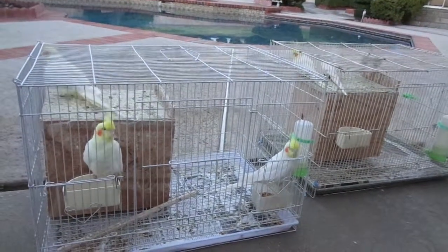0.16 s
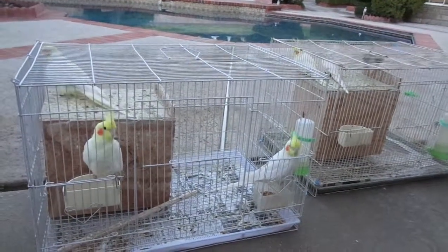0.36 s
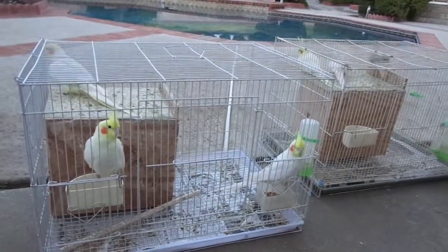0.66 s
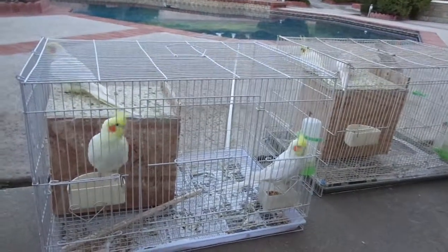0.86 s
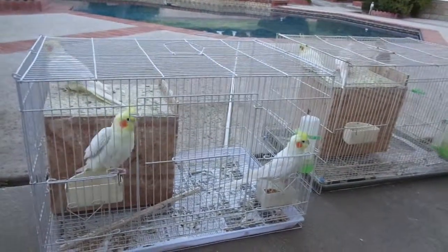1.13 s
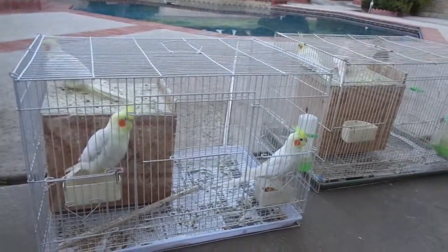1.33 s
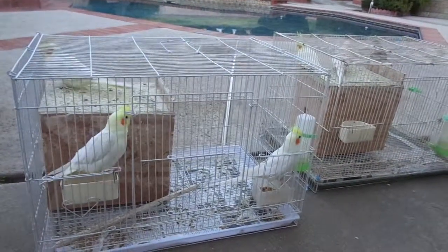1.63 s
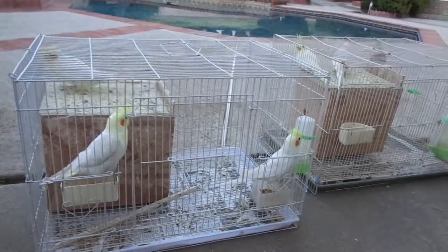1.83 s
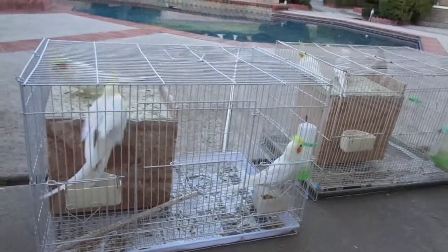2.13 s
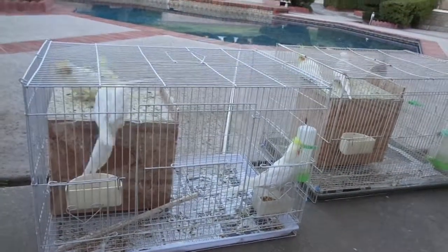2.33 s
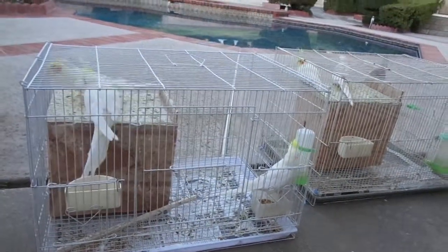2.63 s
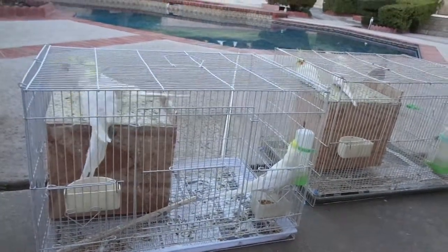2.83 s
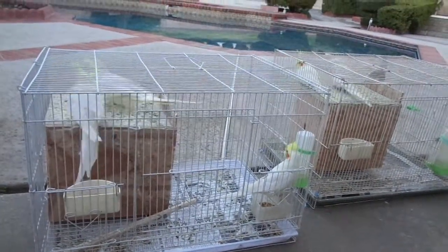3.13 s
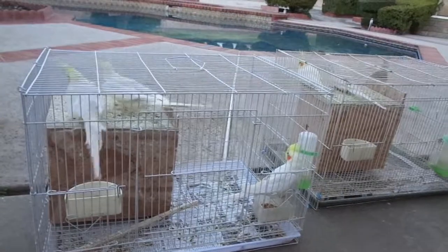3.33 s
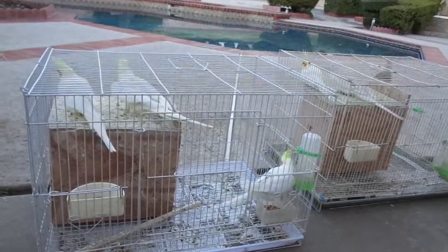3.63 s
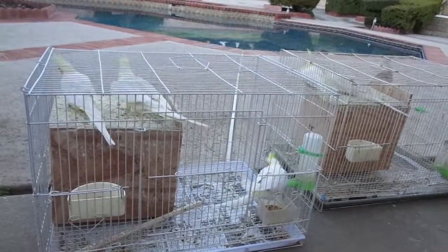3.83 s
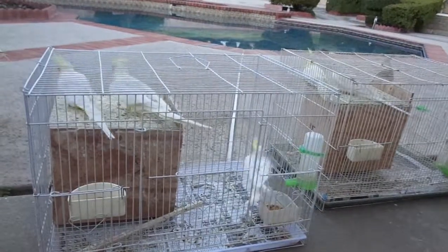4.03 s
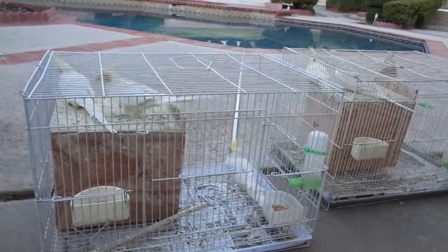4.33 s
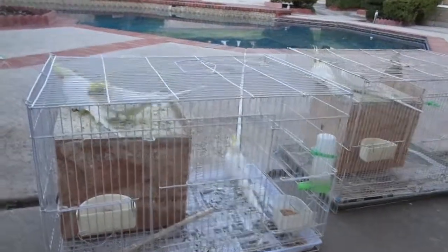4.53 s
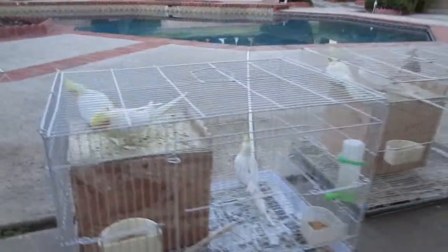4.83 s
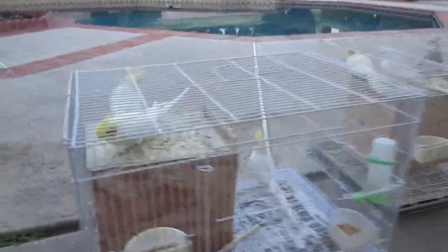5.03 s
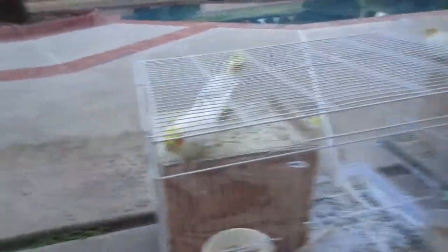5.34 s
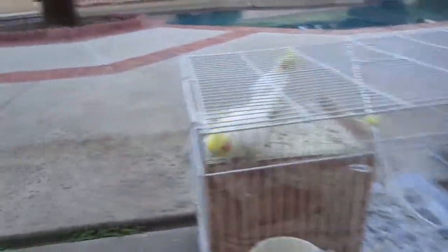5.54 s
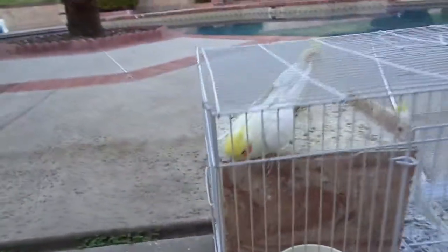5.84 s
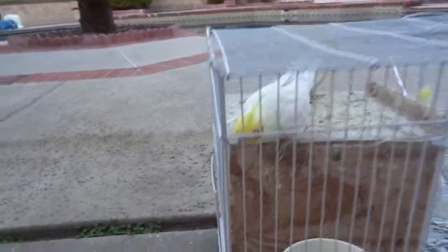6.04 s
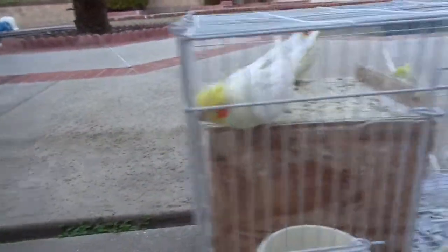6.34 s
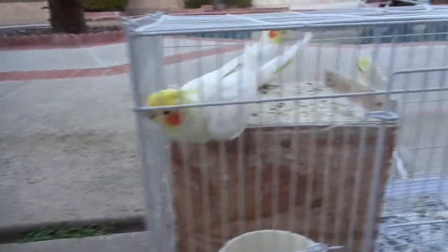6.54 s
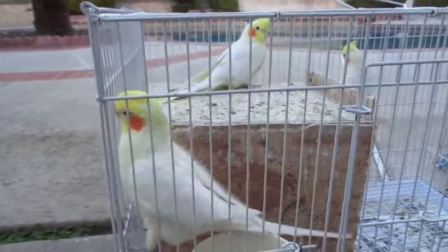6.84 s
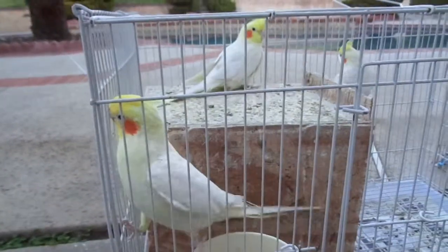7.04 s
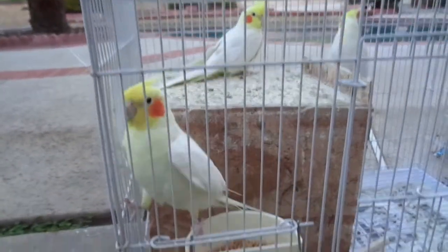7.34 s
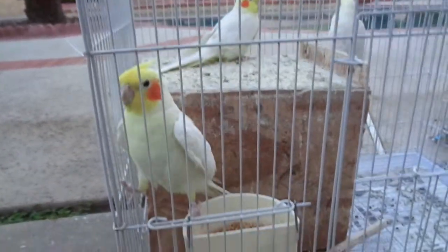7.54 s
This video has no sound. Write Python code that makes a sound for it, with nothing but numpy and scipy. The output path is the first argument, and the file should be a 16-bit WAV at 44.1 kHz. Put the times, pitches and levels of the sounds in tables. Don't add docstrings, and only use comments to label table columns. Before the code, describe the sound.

Caged cockatiels outdoors: clear whistled phrases, trilling warbles, a pause, one raspy chirp and croak, light claw taps over soft suburban hush.

```python
import sys
import numpy as np
from scipy import signal
from scipy.io import wavfile
from scipy.ndimage import uniform_filter1d

SR = 44100
rng = np.random.default_rng(int(sys.argv[2]) if len(sys.argv) > 2 else 0)


def ratio_of_db(decibels):
    return 10 ** (np.asarray(decibels, float) / 20)


def wav_record(signal):
    frames = np.transpose(np.atleast_2d(signal))
    bounded = np.clip(frames, -1, 1)
    quanta = np.round(bounded * 32767).astype(np.int16)
    wavfile.write(sys.argv[1], SR, quanta)


N = 338688

# start t/s, length t/s, from f/Hz, to f/Hz, peak level/dB
EASED_NOTES = [
    (0.024, 0.12, 2210, 2282, -16),
    (0.655, 0.082, 2234, 2029, -19),
    (2.93, 0.073, 1900, 2253, -22),
    (3.507, 0.1106, 2242, 2381, -17),
    (3.961, 0.092, 2318, 2442, -14.5),
]
# start t/s, length t/s, from f/Hz, to f/Hz, peak level/dB
HELD_NOTES = [
    (0.235, 0.084, 2175, 1896, -19.5),
    (0.439, 0.11, 2351, 2281, -17.5),
    (0.873, .103, 2239, 2166, -18),
    (3.309, 0.075, 2186, 2080, -23.5),
]
# start t/s, length t/s, from f/Hz, to f/Hz, peak level/dB
SETTLED_NOTES = [
    (1.081, 0.077, 2081, 1981, -22.5),
    (2.614, 0.075, 1941, 1611, -34.5),
    (3.723, 0.091, 2125, 1963, -23),
    (4.181, 0.081, 1971, 1911, -16.5),
]
# start t/s, length t/s, from f/Hz, to f/Hz, peak level/dB
ARCHED_NOTES = [
    (2.679, .09, 1790, 1530, -18.5),
]
# start t/s, length t/s, from f/Hz, to f/Hz, peak level/dB
NEAR_CHIRP = (6.437, .042, 1365, 1195, -25)
# peak [share of length],
# then octave, low and high overtones level/dB below the peak
BEAK_LEVELS = [(0.52, -34.5, -47.5, -39.5), (0.44, -37, -40, -38), (0.6, -33, -42, -40.5),
               (0.69, -35.5, -43.5, -38), (.45, -38.5, -46.5, -50), (0.37, -42.5, -41.5, -38),
               (0.55, -39.5, -40, -34.5), (0.55, -45, -40.5, -41.5), (0.78, -27, -44, -42),
               (0.72, -31, -39, -45.5), (0.66, -45, -50.5, -57), (0.73, -24.5, -41, -45.5),
               (0.6, -37, -50, -56), (0.62, -21.5, -49, -53.5)]
CHIRP_BEAK_LEVELS = (.27, -35, -31, -62)
# entry pitch [share], entry t/s, glide delay [power], glide ease [power],
# entry level/dB, spoken level/dB
EASE_WAY = (0.9354, 0.0263, 1.01, 1.96, -26, -8)
HOLD_WAY = (0.935, 0.01, 2.5, 1.13, -22.5, -5.5)
LAND_WAY = (1.035, .024, 1.01, 4, -22, -10)
LINGER_WAY = (.99, .015, 1.7, 1.4, -16, -5)
SETTLE_WAY = (1.02, .014, 1.01, 2.4, -25, -15)
ARCH_WAY = (.93, .05, 3.2, 1.01, -15, -3)
SNAP_WAY = (1, .004, 1, 1.7, -5, -2)
BEAK_PEAK_SHARES = (0.63, 0.55, .35)
BEAK_END_DB = (-17.5, -14, -12.5)
# multiple of the fundamental [1], level/dB
LOW_PARTIALS = [(3, 3), (4, -10.5)]
# multiple of the fundamental [1], level/dB
HIGH_PARTIALS = [(5, 0.5), (6, 7), (7, -2.5)]
END_DB, CHIRP_END_DB, BEAK_CLOSED_DB = -7.5, -13.5, -36
# t/s, length t/s, from f/Hz, to f/Hz, level/dB
PITCH_FLICKS = [(.008, .028, 1650, 2700, -47), (0.207, .02, 1490, 1890, -49),
                (0.29, 0.021, 1962, 1860, -29), (0.528, 0.012, 1900, 1500, -45),
                (0.495, 0.032, 3060, 2770, -57), (0.723, .014, 1990, 1740, -38),
                (0.953, 0.013, 1780, 1610, -40.5), (0.953, .014, 2650, 2890, -58),
                (1.144, 0.0217, 2045, 2370, -31), (2.762, 0.023, 1650, 1430, -36),
                (4.81, 0.027, 3400, 3600, -46), (3.294, 0.031, 1810, 2150, -32.5),
                (3.363, 0.014, 1980, 1700, -33), (3.598, 0.011, 2530, 2940, -43),
                (3.788, .014, 1730, 1510, -47), (4.034, 0.02, 1850, 1500, -45),
                (4.03, 0.019, 5000, 2950, -51), (4.24, 0.0213, 1974, 2300, -24),
                (2.7, 0.019, 1500, 1750, -33.5), (6.427, 0.0084, 1450, 1200, -37),
                (7.07, 0.074, 4180, 3930, -59), (2.02, 0.048, 3800, 4150, -57),
                (7.46, 0.0082, 2000, 2500, -49), (7.482, 0.0085, 2240, 2300, -55)]
# t/s, length t/s, from f/Hz, to f/Hz, level/dB
SQUEAKS = [
    (3.168, .016, 3300, 3250, -42),
    (3.262, .014, 3250, 3350, -48),
    (3.286, .016, 3300, 3350, -45),
    (6.446, .016, 13000, 12300, -61),
    (6.446, .014, 11900, 11400, -61),
]
# t/s, level/dB, half-width t/s
WHISTLE_DIPS = [(0.08, -10.5, 0.0051), (0.308, -1, 0.0067), (0.47, -11, 0.0062), (0.493, -37, 0.0087),
                (0.529, -6, 0.0037), (0.691, -6, 0.0043), (0.703, -1, .004), (0.723, -28, 0.0045),
                (0.737, -12, 0.0075), (0.946, -8, 0.0035), (3.351, -22, 0.0026), (3.547, -10, 0.011),
                (3.571, -4, 0.0039), (3.58, -8, 0.0035), (4.005, -6, 0.0037), (4.017, -6, 0.003),
                (4.046, -14.5, 0.0027), (4.257, -12, 0.0093), (4.39, -7, .04), (.042, 4, .01),
                (.32, 6, .005), (.355, -4, .025), (.68, 4, .008), (.9, 2.5, .012), (.976, 4, .009),
                (1.33, 5, .07), (2.765, 4, .007), (2.952, 5, .016), (2.985, 3, .004), (3.558, 3, .006),
                (3.77, 6, .007), (3.808, 5, .008), (3.982, 5, .008), (4.272, 5, .012), (4.31, 3, .012)]
# t/s, level/dB, half-width t/s
WHISTLE_SWELLS = [(0.072, 3, 0.02), (0.107, 3.5, 0.0095), (0.123, -3, 0.009), (0.148, 8.5, 0.014),
                  (0.149, -9.5, 0.034), (0.17, -7, 0.018), (0.265, 2, 0.014), (0.311, -10, 0.0057),
                  (0.472, -1, 0.032), (0.504, 4, 0.013), (0.521, 6.5, 0.0065), (0.549, 6.5, 0.015),
                  (0.6, -3, 0.04), (0.647, -7, 0.013), (0.729, -3, 0.0075), (0.751, 6.5, 0.0086),
                  (0.782, -12, 0.014), (0.884, -6, 0.012), (0.933, 5, 0.0075), (0.958, -4, 0.012),
                  (0.997, 8, 0.0083), (1.031, -6, 0.035), (2.78, -4, 0.016), (3.412, 7, 0.012),
                  (3.538, -5, 0.0055), (3.566, 6.5, 0.0036), (3.598, -9.5, 0.0075), (3.639, 6.5, 0.034),
                  (3.643, 1.5, 0.033), (3.752, -3.5, 0.029), (3.799, 6, 0.012), (3.871, 6.5, 0.031),
                  (4.004, -3.5, 0.0067), (4.02, 6.5, 0.0095), (4.021, 3.5, 0.0037), (4.047, -8, 0.006),
                  (4.054, 5.5, 0.0042), (4.077, 6, 0.035), (4.124, -5, 0.037), (4.169, -11, 0.011),
                  (4.217, 4, 0.011), (4.279, -6.5, 0.032), (4.286, -13, 0.0054), (4.334, -8, 0.015)]

# t/s, bottom f/Hz, top f/Hz, level/dB, throat resonance f/Hz
WARBLE_CURVES = [
    [(3.09, 1553, 1577, -47, 1650), (3.115, 1732, 1775, -35, 1870), (3.14, 1812, 1998, -39.5, 1890),
     (3.165, 1487, 2545, -29.5, 2430), (3.2, 1699, 2866, -28, 2340), (3.23, 1701, 2740, -33, 2360),
     (3.26, 1756, 2674, -31.5, 2400), (3.28, 1615, 2604, -33, 2310), (3.305, 1554, 2490, -33, 2230)],
    [(4.364, 1530, 1640, -42, 1900), (4.385, 1625, 1779, -47.5, 2020), (4.417, 1726, 2107, -34.5, 2090),
     (4.44, 1758, 2508, -37.5, 2250), (4.462, 1798, 2832, -38, 2640), (4.506, 1770, 2890, -38.5, 2700),
     (4.545, 1706, 2810, -41, 2580), (4.575, 1640, 2216, -47, 2180)],
    [(4.615, 1506, 1546, -50, 1560), (4.645, 1749, 1773, -36.5, 1810), (4.69, 1795, 2524, -31.5, 2120),
     (4.728, 2398, 3144, -30.5, 3050), (4.752, 2000, 3040, -30, 2230), (4.775, 1922, 2953, -32, 2060),
     (4.798, 1844, 2896, -34, 1970), (4.81, 1893, 3100, -32.5, 2750), (4.858, 1907, 2620, -41.5, 2290)],
    [(4.995, 1710, 1920, -60, 1970), (5.04, 1766, 2310, -59, 2290), (5.075, 1800, 2310, -72, 2230)],
]
# swing f/Hz, first phase [turns], unevenness [turns], second partial level/dB
WARBLE_SWINGS = [(100.1, 0.097, 0.19, -4), (44.6, 0.44, .06, 9), (99.8, 0.098, 0.15, -2),
                 (95.6, 0.081, 0.085, 13)]
# off-resonance level/dB, beak ring level/dB, throat width f/Hz, echo level/dB
WARBLE_FILTERS = [(-9, -1.5, 267, 1), (-6, -9, 280, 2.5), (-8, 1.5, 290, 0.5), (-11, -10, 330, .5)]
THIN_DB, THIN_HZ, THIRD_DB = -21, 345, -11.5
WIDE_THIRD_DB, SHEEN_DB = -4, -26
RING_HZ, RING_WIDTH_HZ = 5140, 500
# t/s, length t/s, from f/Hz, to f/Hz, width f/Hz, level/dB
HOARSE_AIR = [
    (4.325, .14, 1300, 1700, 280, -49),
    (3.16, .115, 2420, 2350, 130, -36),
    (3.15, .16, 3350, 3250, 450, -53),
    (4.745, .065, 2230, 1930, 150, -39),
    (4.8, .06, 2830, 2350, 170, -40),
    (4.44, .13, 2150, 2250, 450, -46),
]
# t/s, pitch f/Hz, top note level/dB, rasp level/dB
CROAK_CURVE = [
    (6.497, 1826, -44, -34),
    (6.51, 1887, -43, -34.5),
    (6.529, 1863, -28.5, -36),
    (6.553, 2010, -35, -38.5),
    (6.574, 2167, -37.5, -40),
    (6.595, 2115, -35.5, -36),
    (6.613, 1505, -37, -40),
    (6.62, 1480, -62, -61),
]
# f/Hz, width f/Hz, level/dB
RASP_RESONANCES = [(750, 300, -18), (1380, 230, 0), (3700, 700, -30)]

# t/s, peak level/dB, ring f/Hz, treble level/dB
WOOD_KNOCKS = [(1.055, -54, 930, -10), (1.478, -43.5, 1140, -5), (1.701, -49.5, 1180, -16),
               (2.103, -35, 1376, -8.5), (2.155, -42, 1165, -5.5), (2.583, -53.5, 620, -12),
               (5.278, -45.5, 1370, -2.5), (5.601, -34.5, 1165, -8.5), (5.948, -44, 1160, -19),
               (6.019, -40, 1156, -21), (6.255, -43, 1030, -20), (6.899, -40, 1166, -18),
               (7.262, -29.5, 1170, -17)]
# t/s, level/dB, centre f/Hz
WIRE_CLICKS = [(.619, -49.5, 7500), (.669, -46.5, 4990), (2.945, -63, 9000), (3.455, -37, 1750),
               (3.6, -36, 1493), (5.115, -53, 4000), (5.498, -46, 6000), (6.673, -46, 7000),
               (6.771, -42.5, 7960), (7.229, -38.5, 6100), (7.462, -43.5, 698)]
# t/s, length t/s, level/dB, centre f/Hz, treble level/dB
WOOD_SCUFFS = [(0.778, 0.31, -57.5, 626, -11), (2.11, 0.17, -56.5, 930, -8),
               (2.288, 0.068, -57, 800, -25.5), (2.625, 0.22, -53.5, 1190, -19.5),
               (4.11, 0.17, -50.5, 1118, -10), (4.92, 0.1, -46, 1060, -13), (0.808, 0.087, -55, 190, -28),
               (3.471, 0.047, -53, 176.5, -12), (5.115, 0.041, -50, 263, -28.5),
               (5.56, 0.17, -52.5, 980, -13.5), (6.214, 0.11, -58.5, 680, -7),
               (6.628, 0.094, -55, 1964, -6), (6.769, 0.029, -52, 2580, -8),
               (7.246, 0.091, -43.5, 1116, -19.5), (7.442, 0.12, -56, 711, -22),
               (4.456, 0.042, -53, 61, -45.5), (7.33, 0.14, -53.5, 1110, -18.5)]
# t/s, length t/s, level/dB, centre f/Hz
RATTLES = [(3.468, 0.016, -60.5, 7500), (3.665, .008, -54.5, 5950), (4.693, .01, -53.5, 7520),
           (4.925, .06, -55, 6400), (2.608, .03, -54.5, 1880), (4.13, .02, -59, 11000),
           (6.515, .095, -59, 12000), (6.53, .06, -61.5, 7500), (6.666, .014, -59.5, 12000),
           (6.766, .012, -55, 12500), (2.578, 0.0082, -53, 1760), (4.36, .09, -63, 10000),
           (7.222, .014, -55, 13000)]

# f/Hz, decay t/s
PATIO_DECAY = [(300, 0.2), (1200, 0.15), (2200, 0.34), (4500, 0.23), (8000, 0.16), (14000, 0.12)]
# delay t/s, level/dB
WALL_ECHOES = [(.004, -11), (.0105, -11), (.019, -14.5), (.033, -15)]
# f/Hz, density level/dB
AIR_SPECTRUM = [(12, -49), (20, -17), (42, -30), (70, -7), (129, -15), (165, -3), (280, -9), (322, -6),
                (899, -7), (977, -6.5), (1190, -6.5), (2010, -12.5), (4030, -16.5), (5030, -21),
                (15300, -24)]
AIR_DB = -52.5
# t/s, level/dB
CAGE_BUSTLE = [(0, -1), (.45, -2), (.92, 3), (1.3, -3.5), (2.07, -1), (2.59, -3), (3.61, 1), (4.02, 1.5),
               (4.47, 3.5), (4.6, -2), (5.09, 3.5), (5.31, -1.5), (5.65, 0.5), (5.82, -1.5), (6.61, 1.5),
               (7.06, 0), (7.31, 2.5), (7.68, -3.5)]
# t/s, level/dB
TRAFFIC_RUMBLE = [
    (0, 3),
    (1.5, 1),
    (3.3, 0.5),
    (3.6, -3),
    (7.68, 0),
]
# f/Hz, width f/Hz, level/dB
MACHINE_HUM = [(83, 27, -70.5), (160.9, 6.9, -69), (322, 15, -69), (241, 11, -72.5)]
EDGE_HZ = 15100


def whistle(note, beak, way, end_db=END_DB, overtones=LOW_PARTIALS):
    _, length, from_hz, to_hz, db = note
    peak_at, *below_db = beak
    entry, entry_s, delay, ease, entry_db, spoken_db = way
    t = np.arange(0, length, 1 / SR)
    gone = np.clip((t - entry_s) / (length - entry_s), 0, 1)
    glide = 1 - (1 - gone ** delay) ** ease
    hz = from_hz * np.interp(t, [0, entry_s], [entry, 1]) + (to_hz - from_hz) * glide
    level = db + np.interp(t, [0, entry_s, peak_at * length, length], [entry_db, spoken_db, 0, end_db])
    gains = []
    for below, at, shut in zip(below_db, BEAK_PEAK_SHARES, BEAK_END_DB):
        times = [0, entry_s, max(at * length, 1.05 * entry_s), length]
        gains.append(ratio_of_db(db + below + np.interp(t, times, [BEAK_CLOSED_DB, -5, 0, shut])))
    second, low, high = gains
    phase = 2 * np.pi * np.cumsum(hz * (1 + 0.0067 * drift(len(hz), 240))) / SR
    out = ratio_of_db(level) * np.sin(phase) + second * np.sin(2 * phase)
    out += low * sum(ratio_of_db(d) * np.sin(k * phase) for k, d in overtones)
    out += high * sum(ratio_of_db(d) * np.sin(k * phase) for k, d in HIGH_PARTIALS)
    return np.sqrt(2) * out * signal.windows.tukey(len(hz), .12)


def flick(length, from_hz, to_hz, db):
    hz = np.linspace(from_hz, to_hz, round(length * SR))
    flutter = 1 + .012 * np.sin(2 * np.pi * 65 * np.arange(len(hz)) / SR)
    phase = 2 * np.pi * np.cumsum(hz * flutter) / SR
    tone = np.sin(phase) + ratio_of_db(-34) * np.sin(2 * phase)
    return np.sqrt(2) * ratio_of_db(db) * tone * np.hanning(len(hz))


def warble(rows, rate, first, uneven, clean_db, flat_db, ring_db, width):
    bottom, top, db, throat = unroll(rows)
    count = len(db)
    second_db = clean_db + THIN_DB * (1 - np.exp((bottom - top) / THIN_HZ))
    third_db = second_db + THIRD_DB + WIDE_THIRD_DB * (1 - np.exp((bottom - top) / 600))
    turns = first + rate * np.arange(count) / SR + uneven * drift(count, 405)
    swing = .5 + .5 * np.cos(2 * np.pi * turns)
    hz = (bottom + (top - bottom) * swing) * (1 + 0.011 * drift(count, 54))
    phase = 2 * np.pi * np.cumsum(hz) / SR
    fundamental, octave = np.sin(phase), np.sin(2 * phase)
    throat_tone = resonate(resonate(fundamental, throat, width), throat, width)
    tone = ratio_of_db(flat_db) * fundamental + ratio_of_db(2.5) * throat_tone
    tone += ratio_of_db(second_db - 1.6 * abs(hz - throat) / 1000) * octave
    tone += ratio_of_db(third_db) * np.sin(3 * phase)
    tone += ratio_of_db(second_db + ring_db) * resonate(octave, RING_HZ, RING_WIDTH_HZ)
    tone += ratio_of_db(second_db + SHEEN_DB) * (np.sin(4 * phase) + np.sin(5 * phase) + np.sin(6 * phase))
    return np.sqrt(2) * ratio_of_db(db + 2.37 * drift(count, 170)) * tone * signal.windows.tukey(count, .08)


def wheeze(air, length, from_hz, to_hz, width, db):
    hz = np.linspace(from_hz, to_hz, round(length * SR))
    band = resonate(resonate(air[:len(hz)], hz, width), hz, width)
    return ratio_of_db(db) * evened(band) * signal.windows.tukey(len(hz), .5)


def croak():
    hz, db, rasp_db = unroll(CROAK_CURVE)
    count = len(hz)
    t = np.arange(count) / SR
    phase = 2 * np.pi * np.cumsum(hz * (1 + 0.0081 * drift(count, 80))) / SR
    sixth = ratio_of_db(np.interp(t, [.04, .052, .064], [-46, -23, -46]))
    note = np.sqrt(2) * (np.sin(phase) + sixth * np.sin(6 * phase))
    puffs = rng.standard_normal(SR // 2)[:count] * ratio_of_db(3.8 * drift(count, 120))
    rasp = sum(ratio_of_db(d) * resonate(resonate(puffs, f, w), f, w) for f, w, d in RASP_RESONANCES)
    note *= abs(np.sin(np.pi * 40 * (t - .014))) ** .6
    return ratio_of_db(db + 2.7 * drift(count, 120)) * note + ratio_of_db(rasp_db) * evened(rasp)


def claws():
    out, t = np.zeros(N), np.arange(1500) / SR
    rise = 1 - np.exp(-t / 0.00027)
    for s, db, hz, treble_db in WOOD_KNOCKS:
        ring = np.sin(2 * np.pi * hz * t) * ratio_of_db(-60 * t / 0.048)
        snap = rng.standard_normal(len(t)) * ratio_of_db(treble_db - 60 * t / 0.023)
        add(out, s, ratio_of_db(db - 1.0) * rise * (ring + snap))
    for s, db, hz in WIRE_CLICKS:
        snap = evened(resonate(rng.standard_normal(len(t)), hz, 0.38 * hz))
        add(out, s - .002, ratio_of_db(db - 60 * t / 0.018) * rise * snap)
    for s, length, db, hz, treble_db in WOOD_SCUFFS:
        grit, clumps = rng.standard_normal((8000, 2))[:round(length * SR)].T
        grit = grit * ratio_of_db(3.4 * evened(uniform_filter1d(clumps, 150)))
        u = np.linspace(0, 1, len(grit))
        body = evened(resonate(resonate(grit, hz, hz), hz, hz))
        hiss = evened(resonate(grit, 5000, 7000))
        stroke = 2.21 * u ** 0.21 * (1 - u)
        add(out, s, ratio_of_db(db) * (body + ratio_of_db(treble_db) * hiss) * stroke)
    return out


def rattle():
    out, shiver = np.zeros(N), rng.standard_normal((len(RATTLES), 4000))
    for (s, length, db, hz), noise in zip(RATTLES, shiver):
        ring = resonate(resonate(noise, hz, .45 * hz), hz, .45 * hz)
        ring = evened(ring)[:round(length * SR)]
        add(out, s, ratio_of_db(db) * ring * np.hanning(len(ring)) ** .6)
    return out


def patio(x):
    taps = np.zeros(SR)
    at = np.arange(500, SR - 20, 20)
    taps[at + rng.integers(0, 20, len(at))] = rng.choice([-1., 1.], len(at))
    hz, t, z = signal.stft(taps, SR, nperseg=256)
    decay = ratio_of_db(-60 * t / read(PATIO_DECAY, hz)[:, None])
    tail = signal.istft(z * decay, SR, nperseg=256)[1]
    tail *= ratio_of_db(-8.5) / np.linalg.norm(tail)
    for delay, db in WALL_ECHOES:
        tail[round(delay * SR)] += ratio_of_db(db)
    return signal.fftconvolve(x, tail)[:N]


def suburb():
    frames, hz = N // 256 + 5, np.fft.rfftfreq(1024, 1 / SR)[:, None]
    a, b, patches = rng.standard_normal((frames, 513, 3)).T
    patches = evened(uniform_filter1d(uniform_filter1d(patches, 10, 0), 16, 1))
    t = np.arange(frames) * 256 / SR
    bustle_db = np.interp(t, *np.transpose(CAGE_BUSTLE))
    lift_db = bustle_db * 0.79 / (1 + (np.log(hz / 1000 + .01) / 0.76) ** 4)
    lift_db += bustle_db * 0.73 / (1 + (np.log(hz / 3600 + .01) / 0.61) ** 4)
    lift_db += np.interp(t, *np.transpose(TRAFFIC_RUMBLE)) * (hz < 130)
    swell = drift(frames, 25) * (hz < 5000)
    z = (a + 1j * b) * ratio_of_db(read(AIR_SPECTRUM, hz) + lift_db + 1.5 * patches + 0.79 * swell)
    air = signal.istft(z, nperseg=1024, noverlap=768)[1][:N]
    noise = rng.standard_normal(N)
    hum = sum(ratio_of_db(db) * evened(resonate(resonate(noise, f, w), f, w)) for f, w, db in MACHINE_HUM)
    return ratio_of_db(AIR_DB) * evened(air) + hum


def resonate(x, hz, width):
    r = np.exp(-np.pi * width / SR)
    turn = np.exp(2j * np.pi * np.cumsum(hz * np.ones(len(x))) / SR)
    return 2 * (turn * signal.lfilter([1 - r], [1, -r], x / turn)).real


def drift(length, smooth):
    x = rng.standard_normal(SR // 2)[:length]
    return evened(uniform_filter1d(uniform_filter1d(x, int(smooth)), int(smooth)))


def evened(x):
    return x / np.sqrt(np.mean(x ** 2) + 1e-20)


def read(points, hz):
    f, value = np.transpose(points)
    return np.interp(np.log(hz + 1), np.log(f + 1), value)


def unroll(rows):
    s, *columns = np.transpose(rows)
    t = np.arange(s[0], s[-1], 1 / SR)
    return [np.interp(t, s, c) for c in columns]


def add(mix, s, sound):
    part = mix[round(s * SR):][:len(sound)]
    part += sound[:len(part)]


def scene():
    whistler, warbler, sent, near = np.zeros(N), np.zeros(N), np.zeros(N), claws()
    notes = EASED_NOTES + HELD_NOTES + SETTLED_NOTES + ARCHED_NOTES
    ways = [EASE_WAY] * len(EASED_NOTES) + [HOLD_WAY] * len(HELD_NOTES)
    ways += [LAND_WAY, LINGER_WAY, SETTLE_WAY, LAND_WAY] + [ARCH_WAY] * len(ARCHED_NOTES)
    for note, beak, way in zip(notes, BEAK_LEVELS, ways):
        add(whistler, note[0], whistle(note, beak, way))
    for s, *glide in PITCH_FLICKS:
        add(whistler, s, flick(*glide))
    for s, *glide in SQUEAKS:
        add(near, s, flick(*glide))
    for rows, swings, (*tone, echo_db) in zip(WARBLE_CURVES, WARBLE_SWINGS, WARBLE_FILTERS):
        call = warble(rows, *swings, *tone)
        add(warbler, rows[0][0], call)
        add(sent, rows[0][0], ratio_of_db(echo_db) * call)
    air = rng.standard_normal(SR // 2)
    for s, *shape in HOARSE_AIR:
        add(warbler, s, wheeze(np.roll(air, round(s * SR)), *shape))
    chirp = whistle(NEAR_CHIRP, CHIRP_BEAK_LEVELS, SNAP_WAY, CHIRP_END_DB, LOW_PARTIALS[:1])
    add(near, NEAR_CHIRP[0], chirp)
    add(near, CROAK_CURVE[0][0], croak())
    whistle_gain = np.ones(N)
    for s, depth_db, width in WHISTLE_DIPS:
        add(whistle_gain, s - width, (ratio_of_db(depth_db) - 1) * np.hanning(round(2 * width * SR)))
    swelling_db = np.zeros(N)
    for s, db, width in WHISTLE_SWELLS:
        add(swelling_db, s - width, db * np.hanning(round(2 * width * SR)))
    whistle_gain *= ratio_of_db(swelling_db)
    echoes = patio(whistler + sent + ratio_of_db(-5.0) * near)
    return (whistle_gain * (whistler + echoes) + warbler + near + suburb() + rattle())[None]


def roll_off(x):
    return signal.sosfilt(signal.butter(12, 15130, fs=SR, output="sos"), x)


def record(dry):
    lowpass = signal.firwin(511, EDGE_HZ, window=("kaiser", 9), fs=SR)
    limited = signal.oaconvolve(dry, lowpass[None], "same")
    return roll_off(limited)


dry = scene()
out = record(dry)
wav_record(out)
```